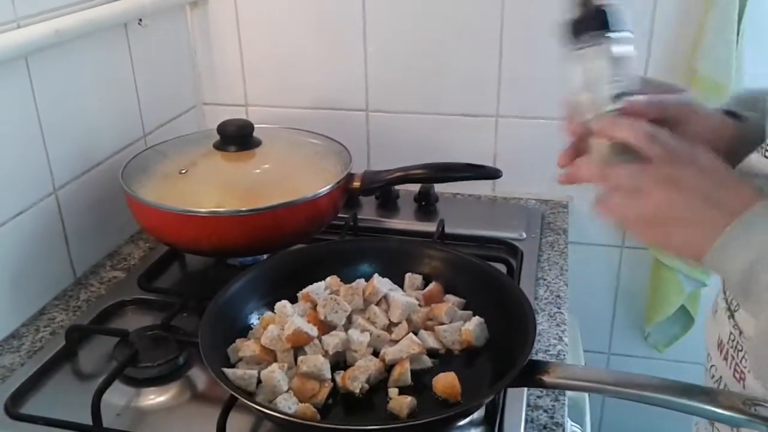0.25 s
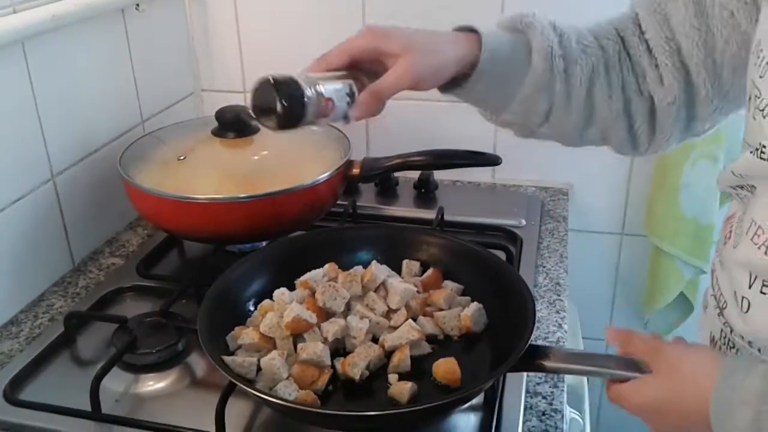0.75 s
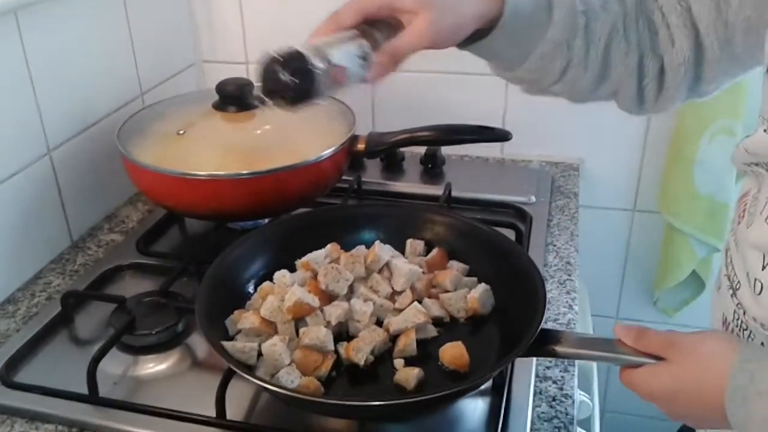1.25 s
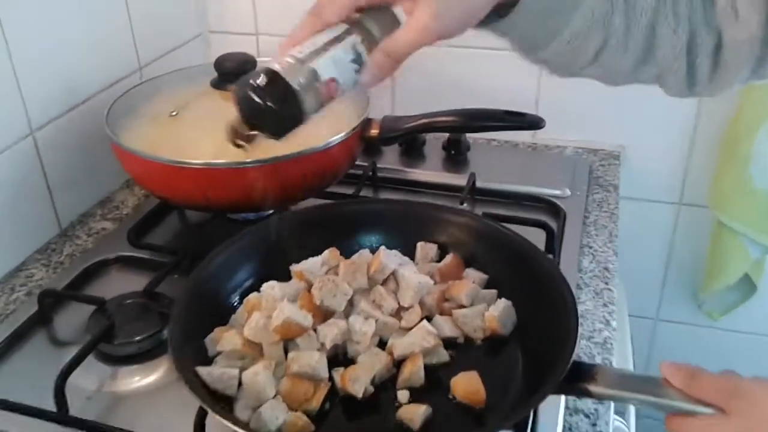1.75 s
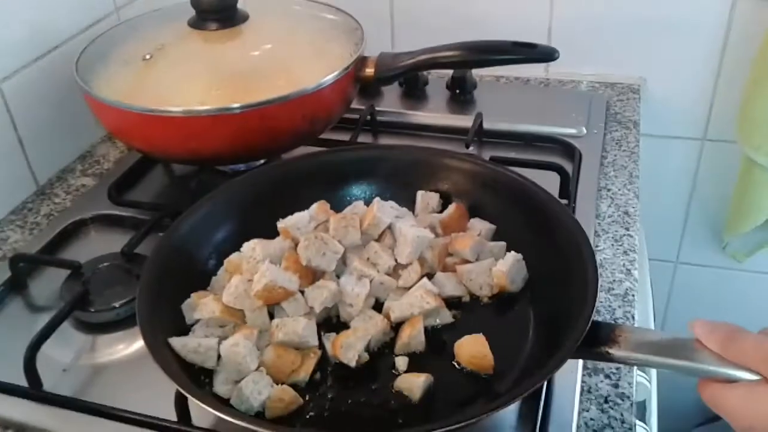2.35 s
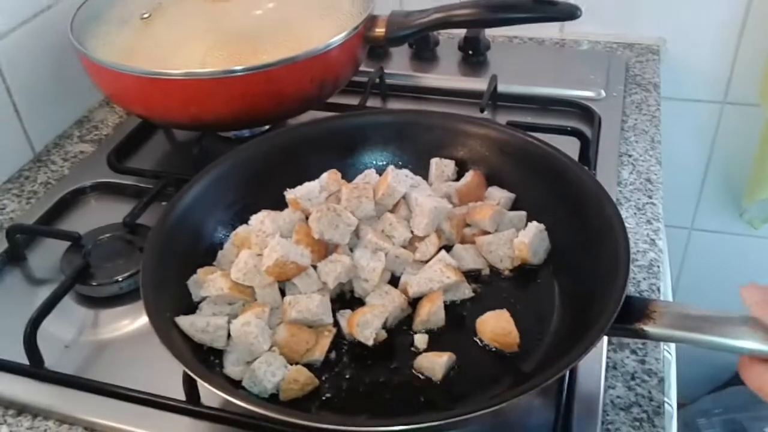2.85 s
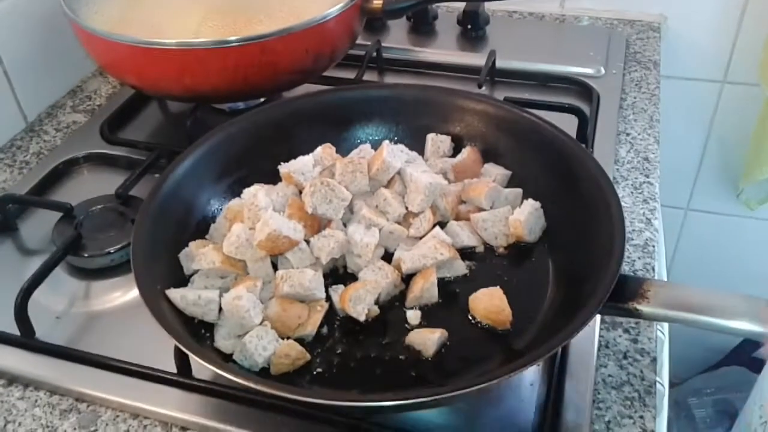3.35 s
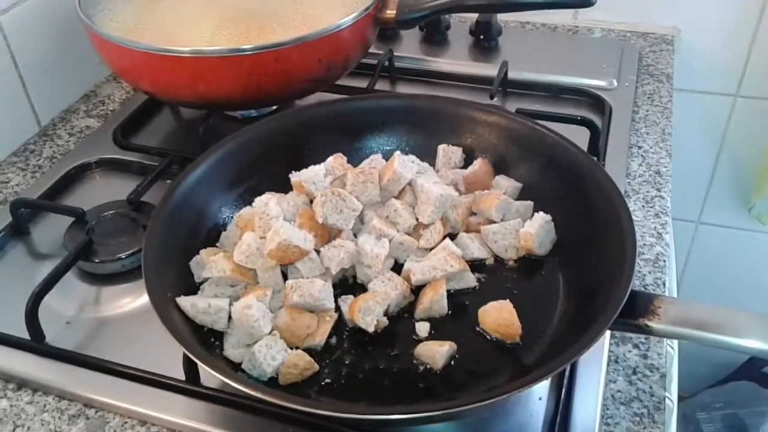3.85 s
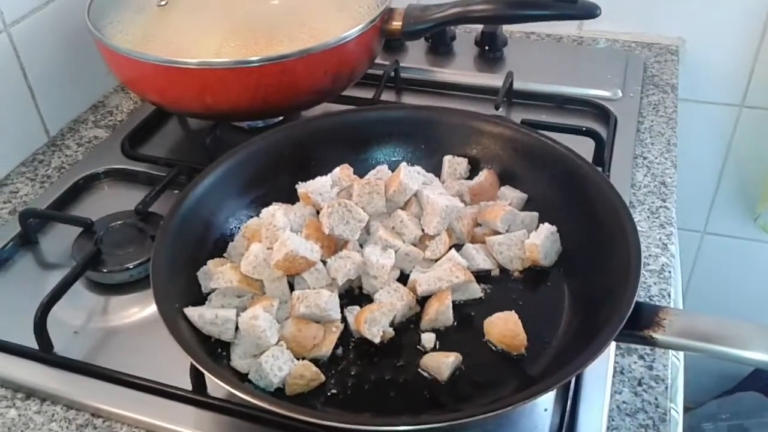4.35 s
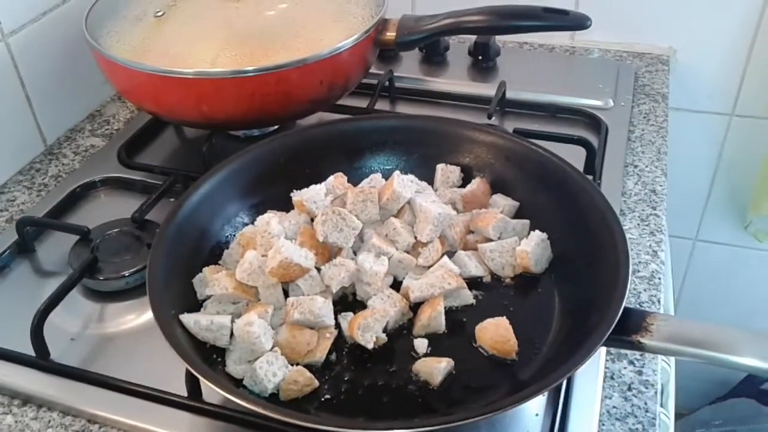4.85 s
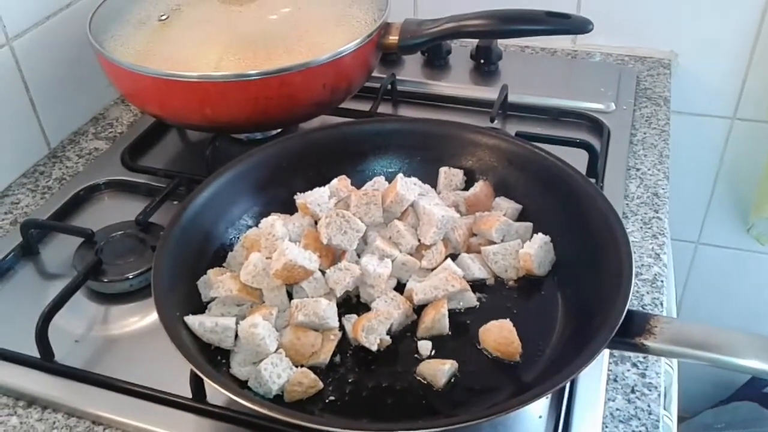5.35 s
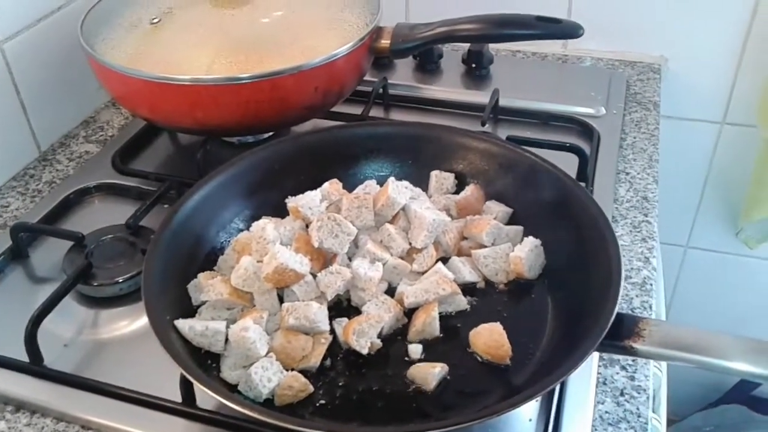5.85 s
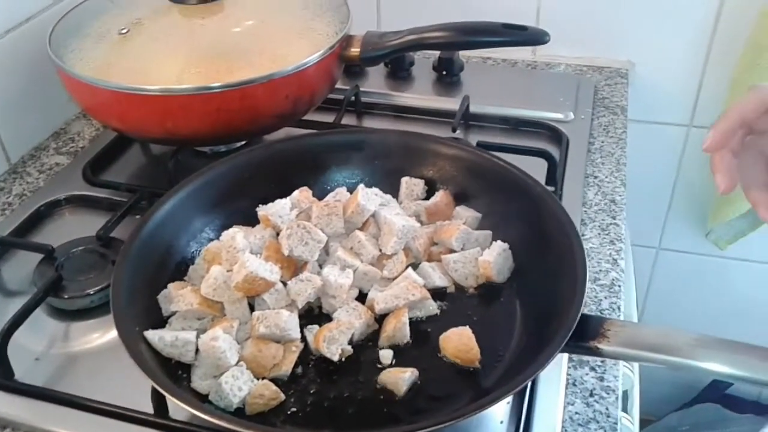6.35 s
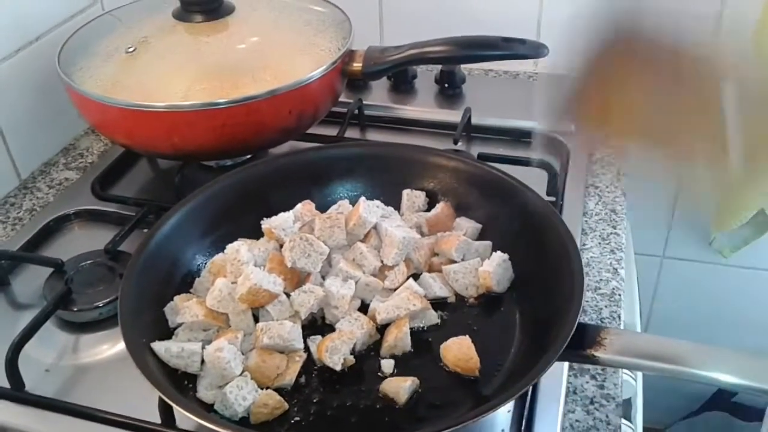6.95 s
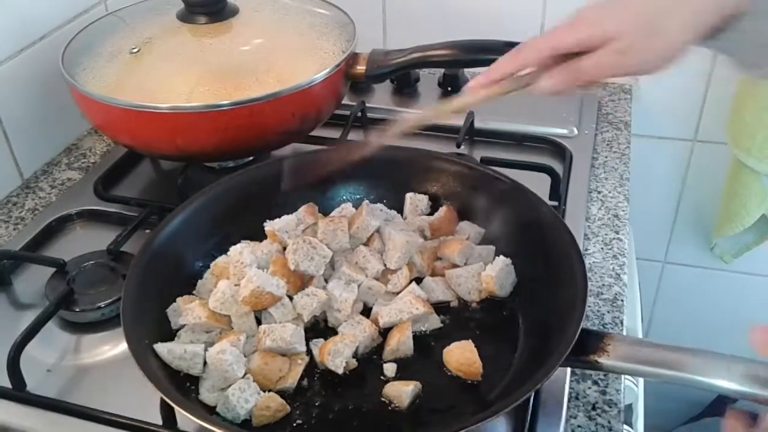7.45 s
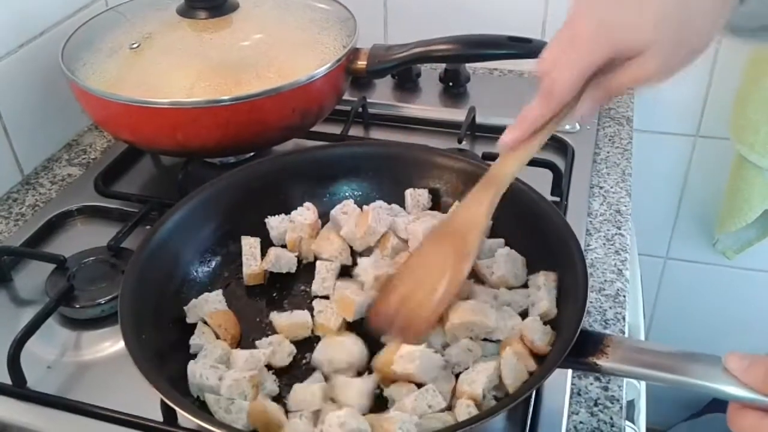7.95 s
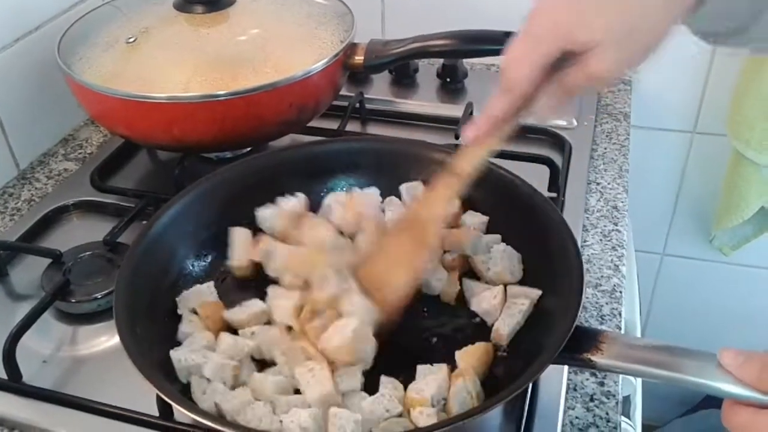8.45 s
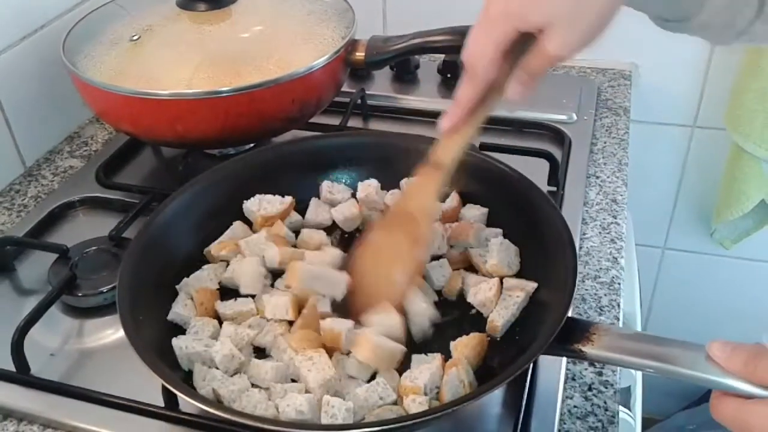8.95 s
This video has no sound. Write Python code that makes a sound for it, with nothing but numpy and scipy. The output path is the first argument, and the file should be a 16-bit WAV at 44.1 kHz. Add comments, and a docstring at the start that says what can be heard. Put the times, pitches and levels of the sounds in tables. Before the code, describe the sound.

Gentle frying with sharp spits, a metallic pan knock, dry seasoning shakes, a clatter of utensils, then crusty scraping and one loud ringing spatula clack.

```python
"""Tiled kitchen: bread cubes sizzle softly in a pan on a gas hob, close to a hand-held mono microphone.
Frying is filtered crackle and noise; burners are a noise rumble under thin, wavering sine whistles.
The pan knocks on its steel grate, seasoning is shaken in as clumped grains, a spatula is drawn from
rattling utensils, and stirring scrapes crusts, strikes the pan and stirs up the sizzle.
Knocks are noise bursts through body spectra plus decaying modes; spits and taps are one-resonance bursts."""
import sys
import numpy as np
from scipy import signal
from scipy.fft import rfft, irfft, next_fast_len
from scipy.io import wavfile
from scipy.ndimage import map_coordinates

SR = 44100
rng = np.random.default_rng(int(sys.argv[2]) if len(sys.argv) > 2 else 0)


def store_wav(level_fs):
    """Save 16-bit WAV to argv[1]."""
    pcm = np.round(np.clip(np.atleast_2d(level_fs), -1, 1) * 32767)
    wavfile.write(sys.argv[1], SR, pcm.T.astype(np.int16))


N = 405279

# Spectra are relative: each sound is scaled after filtering.
# gentle frying: freq_hz, density_db_per_hz
GENTLE_FRYING_SPECTRUM = [(530, -47), (900, -17), (1280, -15.5), (2280, -9), (2570, -6), (2720, -3),
                          (2890, -4.5), (4510, -6), (5580, -5), (9820, -13.5), (10700, -13.5),
                          (11000, -18.5), (15000, -22)]
# fresh bread on hot oil: freq_hz, density_db_per_hz
FRESH_BREAD_SPECTRUM = [(530, -28), (900, -13), (1100, -13), (1280, -15), (2310, -12), (2660, -2),
                        (2850, -2.5), (5990, 1.5), (7060, -7), (9930, -6), (10700, -10), (11300, -12),
                        (15000, -20.5)]
# oil flares up when the bread is disturbed, then calms: start_s, length_s, level_db
FLARES = [(1.6, 0.52, -50), (3.7, 0.63, -56), (7.65, 0.31, -51.5), (8.24, 0.25, -39.3), (8.72, .47, -40)]
SIMMER_DB, FLARE_RISE_S, FLARE_T60_S = -52, 0.2, 7.2
TURN_FROM_S, TURN_TO_S = 7.9, 8.4  # fresh faces of the bread reach the oil

# burner flame rumble: freq_hz, density_db_per_hz
FLAME_SPECTRUM = [(15, -44), (25, -10), (108, -0.5), (189, -2), (214, 1.5), (247, -3.5), (335, -2.5),
                  (563, -6.5), (805, -6.5), (1800, -13.5), (2340, -14), (3960, -120)]
# lowest jet whistle: time_s, level_db
LOW_JET_LEVELS = [(0, -61), (1.15, -60), (1.45, -64), (2.1, -56), (3.5, -59.5), (4, -56.5), (5.2, -60.5),
                  (5.8, -70), (6.55, -59.5), (7.1, -66), (7.8, -56.5), (9.19, -56.5)]
# highest jet whistle: time_s, level_db
HIGH_JET_LEVELS = [(0, -56), (.75, -54), (.95, -61.5), (1.7, -55.5), (2.6, -56.5), (3, -61.5), (4.55, -67),
                   (4.85, -60.5), (5.3, -76), (5.47, -61.5), (6.1, -59.5), (7.1, -65), (7.35, -54.5),
                   (7.95, -54.5), (8.35, -61), (9.19, -53)]
LOW_JET_HZ, MID_JET_HZ, HIGH_JET_HZ = 2730, 4915, 10362
FLAME_DB, MID_JET_DB = -63, -68

# crusts skip under the blade and oil spits: start_s, level_db (before SPIT_GAIN_DB), pitch_hz
SPITS = [(.028, -34, 4400), (1.088, -42, 2920), (1.1557, -39.5, 3430), (1.728, -42, 2920),
         (2.179, -39, 2920), (2.4407, -35, 6000), (3.944, -33, 3440), (5.169, -43, 3520), (5.83, -38, 3700),
         (7.7947, -31.5, 2620), (8.4695, -34, 5570), (8.758, -35, 4500), (9.065, -35, 5550),
         (9.142, -34, 5660), (9.168, -32, 5360)]
SPIT_GAIN_DB, SPIT_T60_S = 1.5, 0.017
LESSER_SPITS_PER_S, LESSER_SPIT_DB, LESSER_SPIT_HZ = 6, 1, 5400  # dB relative to frying strength

# pan rocks on the grate: start_s, level_db (of the summed parts' common gain), thud_db (relative)
KNOCKS = [(0.7003, -43, -2), (0.7027, -31.5, -10), (.7048, -26.5, -20), (0.7092, -35, -1), (.824, -46, -10)]
# modes of rocking pan and grate: freq_hz, level_db (relative), t60_s
GRATE_MODES = [(487, -10, 0.43), (725, -3, 0.25), (969, -12, 0.34), (1925, -13.5, .3), (2530, -7, .24),
               (2530, -4, .3), (2877, -4, 0.29), (2915, 0, 0.31), (2980, 1, 0.5), (3470, -7, .4),
               (4926, -11, .3), (6420, -3, .35)]
# pan-on-grate clack: freq_hz, density_db_per_hz
GRATE_CLACK_SPECTRUM = [(400, -34), (700, -8), (1100, -19), (2100, -15), (2600, -4.5), (3000, -0.5),
                        (3600, -6.5), (4050, -20), (4700, -8), (6100, -9), (7000, -21.5), (8000, -15),
                        (9400, -35), (14000, -50)]
# grate thud: freq_hz, density_db_per_hz
GRATE_THUD_SPECTRUM = [(30, -10), (75, 8.5), (115, 1), (180, -12), (300, 1), (480, 1), (750, 2),
                       (1100, -17), (2500, -51)]

# jar shakes, seasoning patters on bread: start_s, length_s, level_db (before SHAKE_GAIN_DB)
SHAKES = [(1.05, .12, -55), (1.53, .17, -56), (1.67, 0.17, -47.2), (1.9, .11, -52.5), (2.06, .18, -52)]
# dry grains: freq_hz, density_db_per_hz
SEASONING_SPECTRUM = [(50, -10), (150, -7), (600, -5.5), (1300, -6.5), (2000, -3.5), (3050, 1.5),
                      (4200, -3), (5500, -6), (7500, -3.5), (9500, -14), (12000, -18), (15000, -30)]
SHAKE_GAIN_DB, SHAKE_RISE_S, SHAKE_T60_S = 3, 0.052, 0.62

# dull taps, knocks and rubs of handling: start_s, level_db, pitch_hz, t60_s (of the push)
TAPS = [(1.09, -55, 454, .25), (1.504, -54, 330, 0.28), (1.5429, -52.5, 420, .35), (2.12, -50, 140, .06),
        (2.27, -51, 280, .048), (2.375, -52.5, 150, .1), (3.939, -47.5, 280, 0.11), (3.941, -48, 597, 0.12),
        (4.19, -54, 139, .11), (5.353, -31, 1370, .015), (5.355, -50, 220, .1), (5.356, -44.5, 825, 0.13),
        (5.418, -50.5, 1150, .25), (5.468, -45.5, 970, 0.16), (5.526, -50, 1040, .2),
        (5.549, -49.5, 1080, .3), (5.619, -40.5, 1000, .056), (5.776, -45, 285, .033),
        (6.036, -45, 2000, .17), (6.364, -46, 1260, .16), (7.6446, -55, 352, .19),
        (7.797, -41.5, 2100, 0.11), (8.815, -54, 420, .2), (8.924, -47, 450, 0.12), (8.929, -41, 1810, .12)]

# spatula slides along its neighbours: start_s, length_s, level_db
SLIPS = [(6.025, 0.045, -46.5), (6.24, .035, -45.5), (6.32, 0.028, -38), (6.385, 0.018, -47)]
# sliding handles: freq_hz, density_db_per_hz
SLIDE_SPECTRUM = [(50, -24), (200, -8.5), (1200, -10), (3800, -8.5), (4900, -2.5), (5600, -8), (6900, 0.5),
                  (8000, -13), (10000, -14), (13000, -32)]
SLIP_RISE_S, SLIP_T60_S = 0.019, 0.25
# utensils rattle as the spatula leaves: start_s, level_db (common gain), holder_db (relative)
RATTLES = [(6.1355, -33.5, 1), (6.146, -40, 3), (6.1722, -24.5, -12), (6.1772, -23.5, -10.5),
           (6.1815, -24.5, -11.5), (6.204, -35, 2), (6.215, -39.5, 4), (6.234, -34.5, 1),
           (6.2473, -26, -9.5), (6.3405, -41, -8), (6.363, -43, -5), (6.383, -51, -14), (6.389, -38, -22),
           (6.401, -34.5, -23)]
# utensil holder modes: freq_hz, level_db (relative), t60_s
HOLDER_MODES = [(1152, -20, .4), (1766, -20, .4), (2408, -9, .25), (2440, 0, .3), (2524, -6, .25),
                (2623, -5, .35), (2690, -9, .25), (2778, -11, .2), (3022, -13, .3), (4807, -15, .3),
                (5590, -13, .2)]
# handle clack: freq_hz, density_db_per_hz
UTENSIL_CLACK_SPECTRUM = [(400, -31), (1100, -25), (1900, -13), (2550, 1.5), (3300, -6.5), (4300, -10.5),
                          (4850, -3), (5700, 1), (6700, -5), (7700, -9), (9400, -13), (11000, -25),
                          (14000, -46)]
# hollow knock of the holder: freq_hz, density_db_per_hz
HOLDER_KNOCK_SPECTRUM = [(60, -28), (105, -6.5), (200, 0), (270, -2), (400, -10), (700, -5), (1100, -0.5),
                         (1700, -3.5), (2500, 8.5), (3500, -1.5), (6000, -31)]

# spatula pushes crusts over the pan: start_s, length_s, level_db (before PUSH_GAIN_DB)
PUSHES = [(7.62, .12, -52), (7.73, 0.21, -42), (8.05, 0.33, -48), (8.37, 0.12, -42), (8.56, 0.33, -45),
          (8.88, 0.067, -38.5), (9, .19, -44.5)]
# scraping crusts: freq_hz, density_db_per_hz
CRUST_SPECTRUM = [(40, -10), (90, -7), (200, -7), (350, -4), (800, -12), (1030, -8), (1350, -11.5),
                  (2100, -0.5), (3300, 1.5), (4600, -1.5), (6700, 2), (8500, -3.5), (10700, -17),
                  (14000, -33)]
PUSH_GAIN_DB, PUSH_RISE_S, PUSH_T60_S = -1, 0.062, 0.51

# spatula hits the pan wall: start_s, level_db (common gain), thud_db (relative)
STRIKES = [(8.231, -14.5, -23.5), (8.234, -16, -25.5)]
# pan modes: freq_hz, level_db (relative), t60_s
PAN_MODES = [(257, -19, .46), (340, -22, .6), (707, -18, .6), (1095, -11, .4), (1480, -14, .25),
             (1846, -9, .22), (2298, -9, .35), (2496, -5, .32), (2839, -5, .25), (2931, -6, .5),
             (2990, -2.5, .36), (3324, -8, .5), (3859, -7, .25), (3954, -4, .27), (4930, -6, .29),
             (5092, -6, .4), (5230, -7, .3), (5406, -1, .38), (5568, -6, .4), (5796, -4, .2),
             (5915, -4, .35), (6080, -4, .27), (6230, -5, .3), (6690, -9, .35), (7327, -11, .2)]
# blade-on-pan clack: freq_hz, density_db_per_hz
PAN_CLACK_SPECTRUM = [(500, -39), (900, -19.5), (1250, -25), (1480, -9), (1800, -3), (2080, -13),
                      (2400, -7.5), (3000, -1), (3700, -8.5), (4550, -13), (4950, -8), (5450, 3.5),
                      (6500, -11.5), (8700, -18), (10500, -33), (14000, -60)]
# pan thud: freq_hz, density_db_per_hz
PAN_THUD_SPECTRUM = [(60, -24), (170, -10), (260, 1.5), (340, -0.5), (500, -15), (700, -11.5), (900, -22.5)]

# reverberation of the tiled kitchen: freq_hz, t60_s
KITCHEN_DECAY = [(150, 0.75), (400, 0.58), (1000, 0.65), (2800, 0.42), (7300, 0.29), (14000, 0.14)]
ECHO_DB, TOP_HZ = -7, 15080


def amp(db):
    """Decibels to gain."""
    return 10 ** (np.asarray(db) / 20)


def unit(x):
    """Scale to rms 1."""
    return x / np.sqrt(np.mean(x ** 2) + 1e-20)


def along(points, hz):
    """Interpolate (Hz, value) points on a log frequency axis."""
    point_hz, values = np.transpose(points)
    return np.interp(np.log(hz + 1), np.log(point_hz + 1), values)


def curves(rows):
    """One value per sample for each column after the time."""
    time_s, *columns = np.transpose(rows)
    return [np.interp(np.arange(N) / SR, time_s, column) for column in columns]


def wobble(rate):
    """Smooth random curve, rate knots per second."""
    knots = rng.standard_normal(int(N * rate / SR) + 4)
    return map_coordinates(knots, [np.arange(N) * rate / SR])


def filtered(x, response):
    """Apply a zero-phase gain that is a function of frequency."""
    size = next_fast_len(len(x) + SR // 5)
    gain = response(np.fft.rfftfreq(size, 1 / SR))
    return irfft(rfft(x, size) * gain, size)[:len(x)]


def coloured(x, spectrum):
    """Filter by a (Hz, dB) spectrum, at rms 1."""
    return unit(filtered(x, lambda hz: amp(along(spectrum, hz))))


def shaped(x, spectrum):
    """Filter causally by a (Hz, dB) spectrum: minimum phase through the folded cepstrum."""
    size = next_fast_len(len(x) + SR // 5, real=True)
    gain = amp(along(spectrum, np.fft.rfftfreq(size, 1 / SR)))
    cepstrum = irfft(np.log(gain + 1e-6), size)
    cepstrum[1:size // 2] *= 2
    cepstrum[size // 2 + 1:] = 0
    return irfft(rfft(x, size) * np.exp(rfft(cepstrum)), size)[:len(x)]


def decay(time_s, t60):
    """Exponential decay, 60 dB per t60."""
    return np.exp(-np.log(1000) * time_s / t60)


def fade(t60):
    """Half a second of exponential decay."""
    return decay(np.arange(SR // 2) / SR, t60)


def burst(spectrum, t60):
    """Brief noisy push heard through a body; starts near rms 1."""
    push = fade(t60)
    sound = shaped(push * rng.standard_normal(len(push)), spectrum)
    return sound * np.linalg.norm(push) / np.linalg.norm(sound)


def blip(hz, skirt_db, t60):
    """Burst in one broad resonance falling skirt_db per octave to each side."""
    octaves = np.arange(-3, 4)
    return burst(np.transpose([hz * 2. ** octaves, -skirt_db * abs(octaves)]), t60)


def ring(modes):
    """Decaying modes, at slightly fresh strengths and random phases for each blow."""
    hz, db, t60 = np.transpose(modes)
    size = amp(db + rng.standard_normal(len(hz)))
    cycles = hz[:, None] * np.arange(SR // 2) / SR + rng.random((len(hz), 1))
    sound = size @ (np.sin(2 * np.pi * cycles) * [fade(mode_t60) for mode_t60 in t60])
    onset = 1 - fade(0.0033)
    return sound * onset / np.linalg.norm(size)


def crackle(rate, spread_db):
    """Impulses at random moments, rate per second, a few larger than the rest; rms 1."""
    size = amp(spread_db * np.minimum(rng.exponential(size=N), 4))
    hits = rng.random(N) < rate / SR
    return unit(hits * size * rng.choice([-1, 1], N))


def add(track, start_s, sound):
    """Mix a sound in at start_s."""
    start = round(start_s * SR)
    track[start:start + len(sound)] += sound[:N - start]


def strokes(rows, rise_s, t60):
    """Gain of strokes that rise, hold until length_s after the start and decay; the strongest leads."""
    time_s = np.arange(N) / SR
    gains = []
    for start_s, length_s, db in rows:
        rise = np.clip((time_s - start_s) / rise_s, 0, 1)
        fall = decay(np.maximum(time_s - start_s - length_s, 0), t60)
        gains.append(amp(db) * rise * fall)
    return np.max(gains, axis=0)


def frying():
    """Frying strength: steady simmer and flare-ups, summed in power."""
    return np.hypot(amp(SIMMER_DB), strokes(FLARES, FLARE_RISE_S, FLARE_T60_S))


def sizzle():
    """Countless steam bubbles burst in the oil; the spectrum crossfades as the bread is turned."""
    turned = np.clip(curves([(TURN_FROM_S, 0), (TURN_TO_S, 1)])[0], 0, 1)
    bubbles = crackle(rate=5000, spread_db=2.5) + 0.95 * rng.standard_normal(N)
    gentle = np.sqrt(1 - turned) * coloured(bubbles, GENTLE_FRYING_SPECTRUM)
    fresh = np.sqrt(turned) * amp(-3) * coloured(bubbles, FRESH_BREAD_SPECTRUM)
    return (gentle + fresh) * frying() * amp(0.45 * wobble(rate=32))


def whistle(hz, db, waver_db, waver_hz):
    """Thin edge tone of a gas jet, unsteady in pitch and level."""
    phase = 2 * np.pi * np.cumsum(hz + waver_hz * wobble(rate=33)) / SR
    return np.sqrt(2) * amp(db + waver_db * wobble(rate=18)) * np.sin(phase)


def burners():
    """Flames flutter as filtered noise; each jet whistles at its own pitch."""
    flutter = amp(FLAME_DB + 1.15 * wobble(rate=10))
    flame = flutter * coloured(rng.standard_normal(N), FLAME_SPECTRUM)
    low = whistle(LOW_JET_HZ, *curves(LOW_JET_LEVELS), waver_db=1.9, waver_hz=5.2)
    mid = whistle(MID_JET_HZ, MID_JET_DB, waver_db=2.0, waver_hz=16.9)
    high = whistle(HIGH_JET_HZ, *curves(HIGH_JET_LEVELS), waver_db=1.9, waver_hz=5.7)
    return flame + low + mid + high


def spits():
    """Sharp single ticks; lesser ones come at random, scaled by the frying strength."""
    track = np.zeros(N)
    for start_s, db, hz in SPITS:
        add(track, start_s, amp(db + SPIT_GAIN_DB) * blip(hz, skirt_db=16, t60=SPIT_T60_S))
    strength = frying()
    for i in np.flatnonzero(rng.random(N) < LESSER_SPITS_PER_S / SR):
        tick = blip(LESSER_SPIT_HZ, skirt_db=14, t60=SPIT_T60_S)
        add(track, i / SR, strength[i] * amp(LESSER_SPIT_DB) * tick)
    return track


def pan_knocks():
    """The gripped pan rocks on the grate, which clacks, rings and thuds on the hob."""
    track = np.zeros(N)
    for start_s, db, thud_db in KNOCKS:
        metal = amp(-13) * ring(GRATE_MODES)
        clack = amp(2.5) * burst(GRATE_CLACK_SPECTRUM, t60=0.045)
        thud = amp(thud_db) * burst(GRATE_THUD_SPECTRUM, t60=0.031)
        add(track, start_s, amp(db) * (clack + metal + thud))
    return track


def seasoning():
    """Dry grains slide and scatter in little clumps with each shake."""
    grains = crackle(rate=4000, spread_db=2.5) * amp(1.3 * wobble(rate=70))
    shakes = amp(SHAKE_GAIN_DB) * strokes(SHAKES, SHAKE_RISE_S, SHAKE_T60_S)
    return shakes * coloured(grains, SEASONING_SPECTRUM)


def handling():
    """Soft, dry contacts close to the microphone, each one broad resonance."""
    track = np.zeros(N)
    for start_s, db, hz, t60 in TAPS:
        add(track, start_s, amp(db) * blip(hz, skirt_db=14, t60=t60))
    return track


def utensils():
    """Handles slide and clack against each other; contacts knock and ring their holder."""
    scrape = coloured(crackle(rate=2500, spread_db=3), SLIDE_SPECTRUM)
    track = strokes(SLIPS, SLIP_RISE_S, SLIP_T60_S) * scrape
    for start_s, db, holder_db in RATTLES:
        holder = amp(-4) * ring(HOLDER_MODES) + amp(1.5) * burst(HOLDER_KNOCK_SPECTRUM, t60=0.05)
        clack = amp(4.5) * burst(UTENSIL_CLACK_SPECTRUM, t60=0.02)
        add(track, start_s, amp(db) * (clack + amp(holder_db) * holder))
    return track


def stirring():
    """Crusts stick and slip in clumps ahead of the spatula."""
    grains = crackle(rate=1500, spread_db=0) * amp(1.4 * wobble(rate=65))
    pushes = amp(PUSH_GAIN_DB) * strokes(PUSHES, PUSH_RISE_S, PUSH_T60_S)
    return pushes * coloured(grains, CRUST_SPECTRUM)


def spatula_strikes():
    """The blade clacks on the wall and rebounds; the pan rings on from the first contact."""
    track = np.zeros(N)
    for start_s, db, thud_db in STRIKES:
        clack = amp(3) * burst(PAN_CLACK_SPECTRUM, t60=0.028)
        thud = amp(thud_db) * burst(PAN_THUD_SPECTRUM, t60=0.14)
        add(track, start_s, amp(db) * (clack + thud))
    first_s, first_db, _ = STRIKES[0]
    add(track, first_s, amp(first_db - 9.5) * ring(PAN_MODES))
    return track


def kitchen(x):
    """Tiled walls answer after 5 ms: a noise tail, each frequency dying at its own speed."""
    hz, time_s, noise = signal.stft(rng.standard_normal(SR), SR, nperseg=256)
    dying = noise * decay(time_s, along(KITCHEN_DECAY, hz)[:, None])
    tail = signal.istft(dying, SR, nperseg=256)[1]
    delayed = np.pad(x, (SR // 200, 0))
    return signal.fftconvolve(delayed, tail / np.linalg.norm(tail))[:N]


def scene():
    """Blows echo in the kitchen above the dry, steady cooking; both channels are alike."""
    blows = pan_knocks() + utensils() + spatula_strikes()
    cooking = sizzle() + burners() + spits() + seasoning() + stirring()
    mono = blows + amp(ECHO_DB) * kitchen(blows) + cooking + handling()
    return np.array([mono, mono])


def record(dry):
    """Band limit: nothing is kept from TOP_HZ up."""
    return np.array([filtered(channel, lambda hz: hz < TOP_HZ) for channel in dry])


dry = scene()
out = record(dry)
store_wav(out)
```